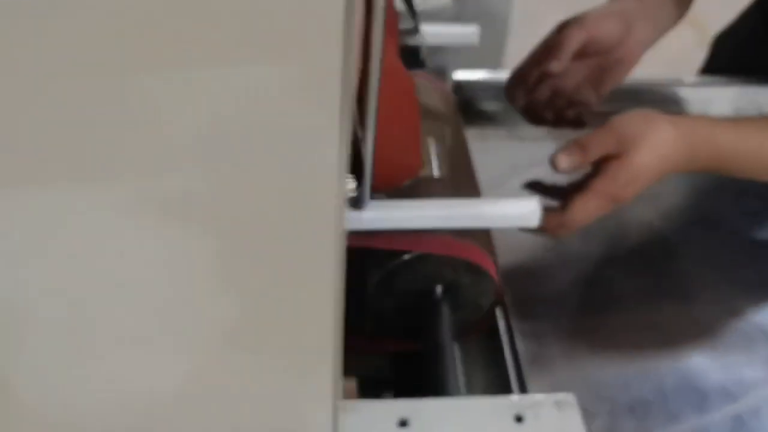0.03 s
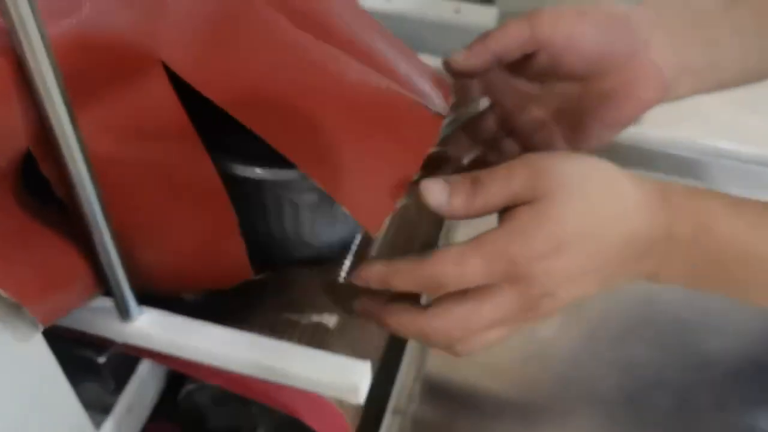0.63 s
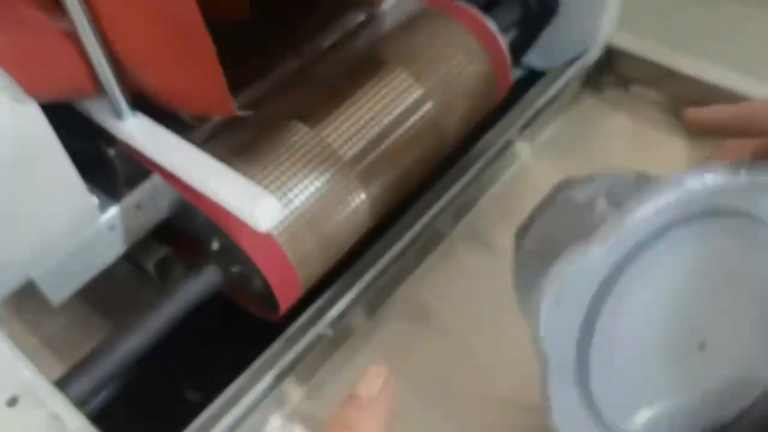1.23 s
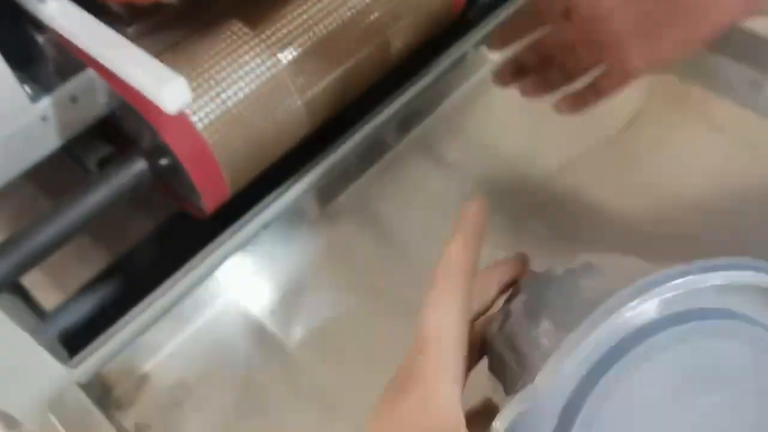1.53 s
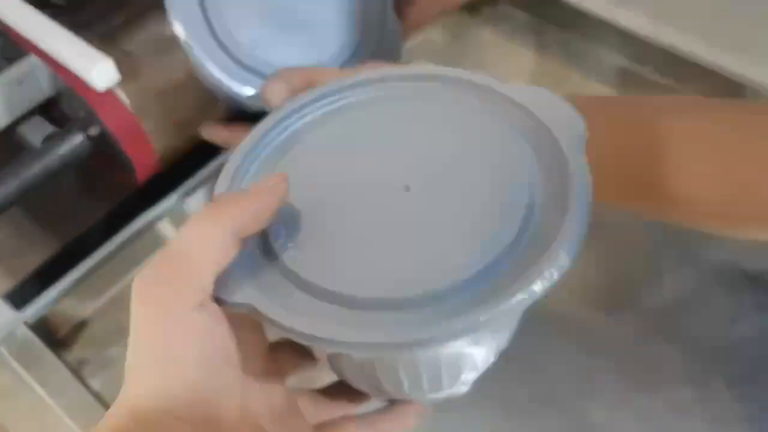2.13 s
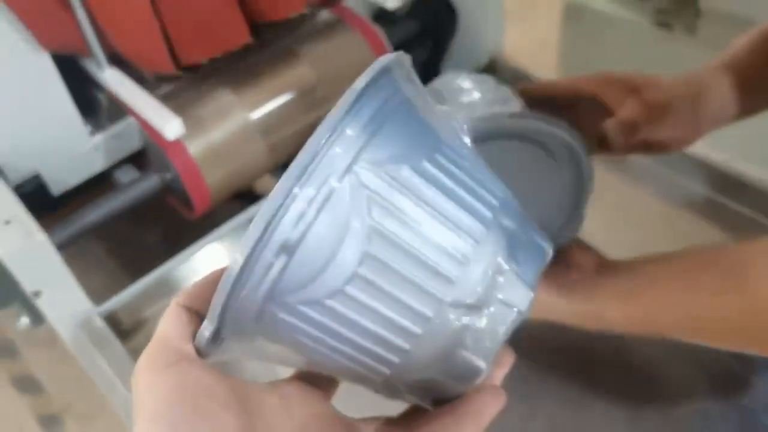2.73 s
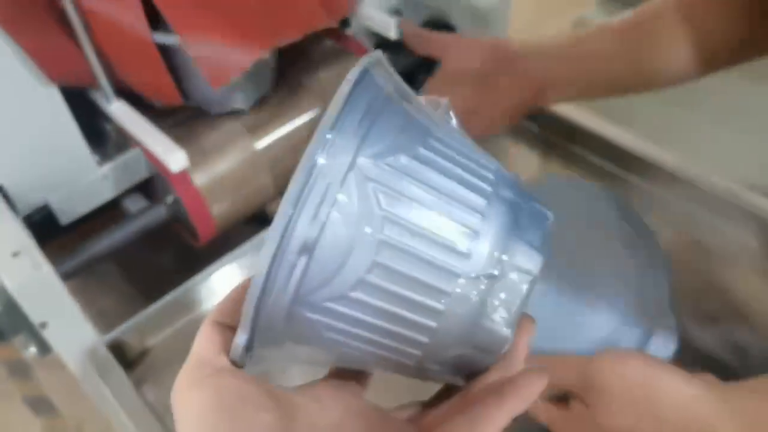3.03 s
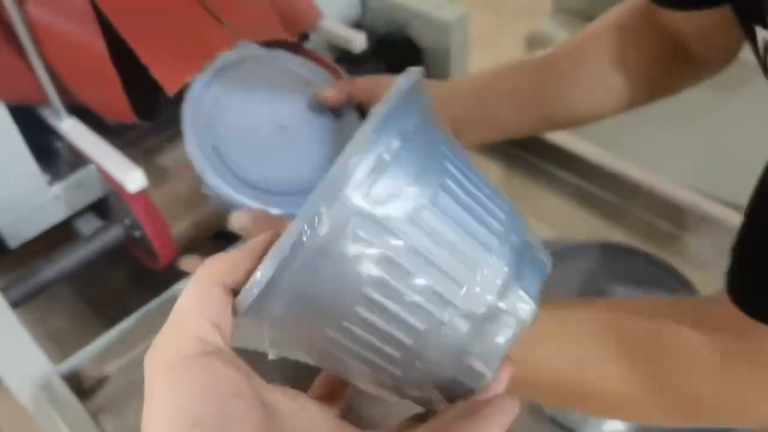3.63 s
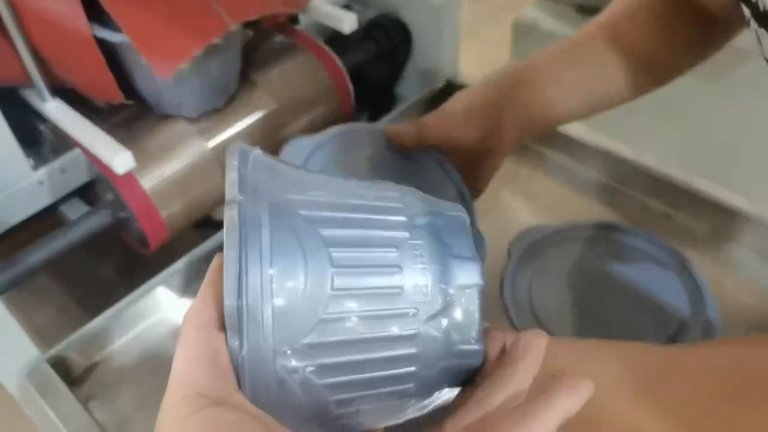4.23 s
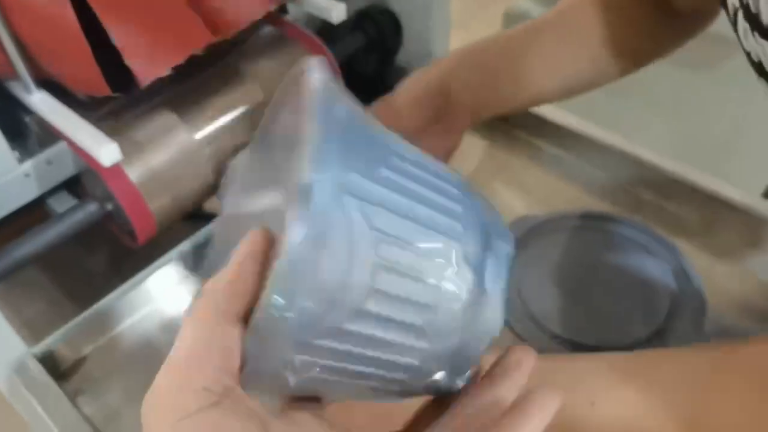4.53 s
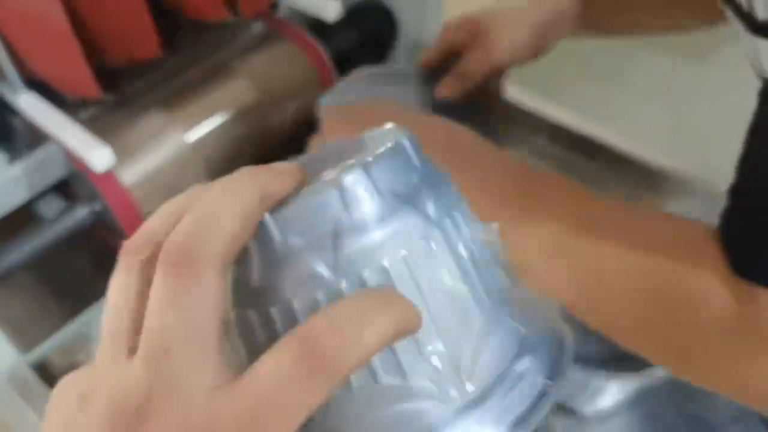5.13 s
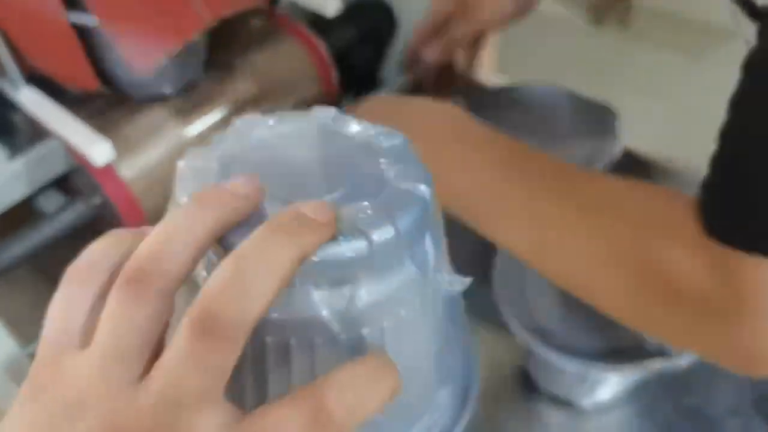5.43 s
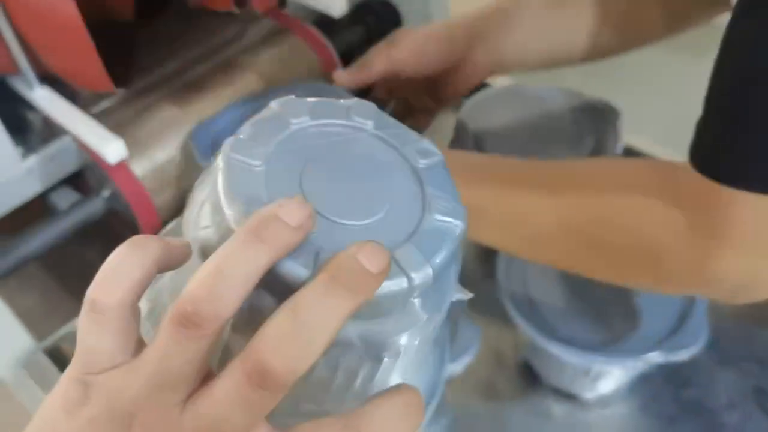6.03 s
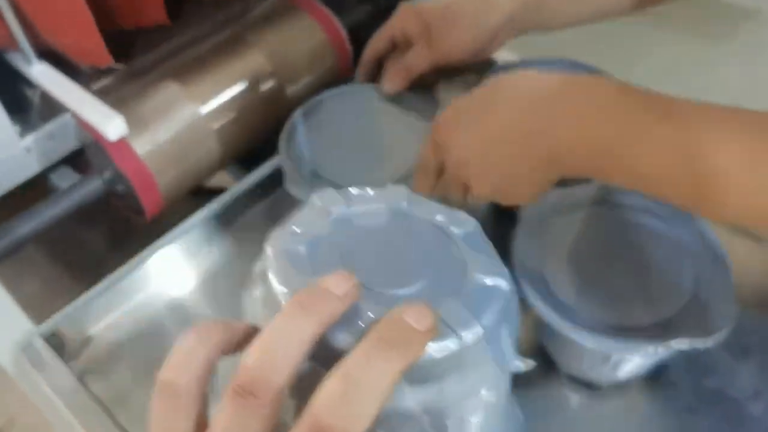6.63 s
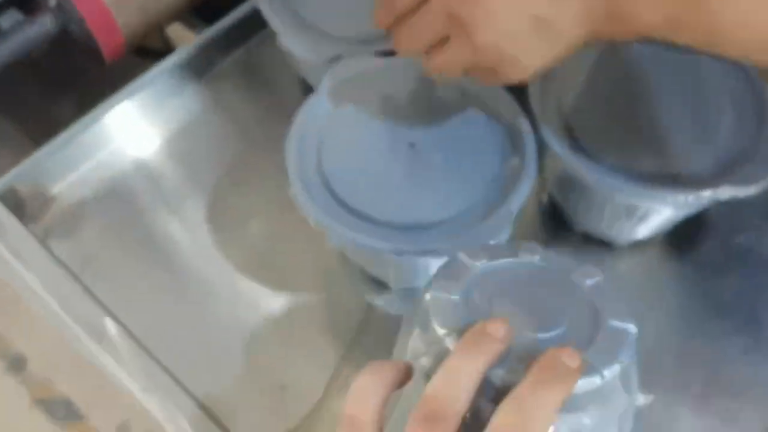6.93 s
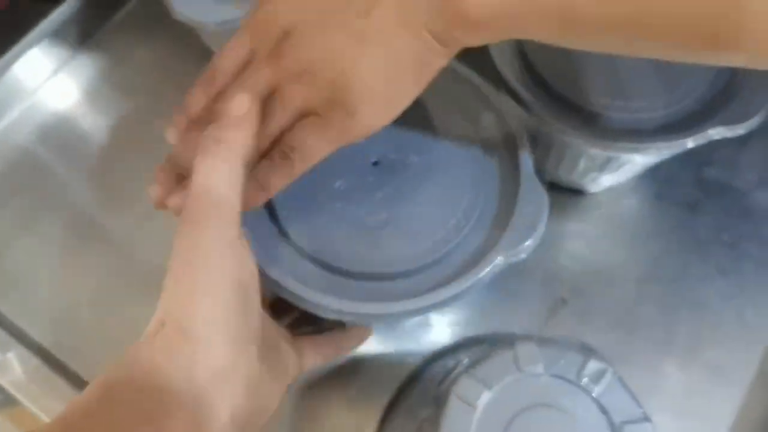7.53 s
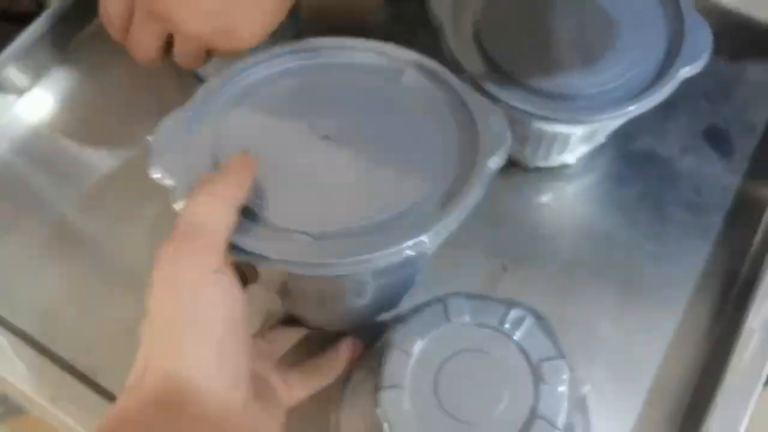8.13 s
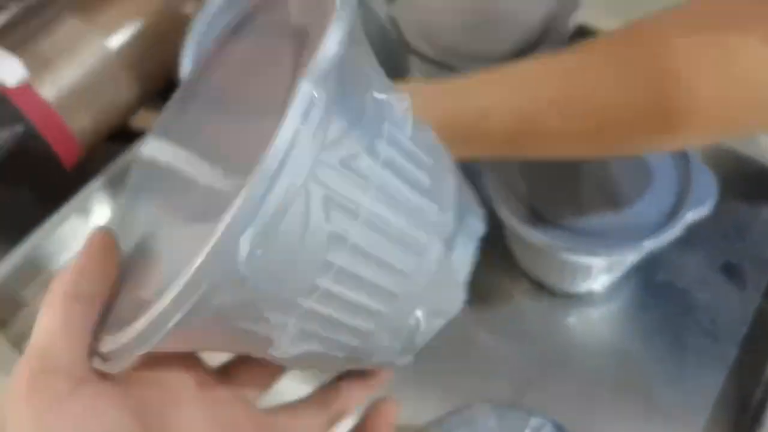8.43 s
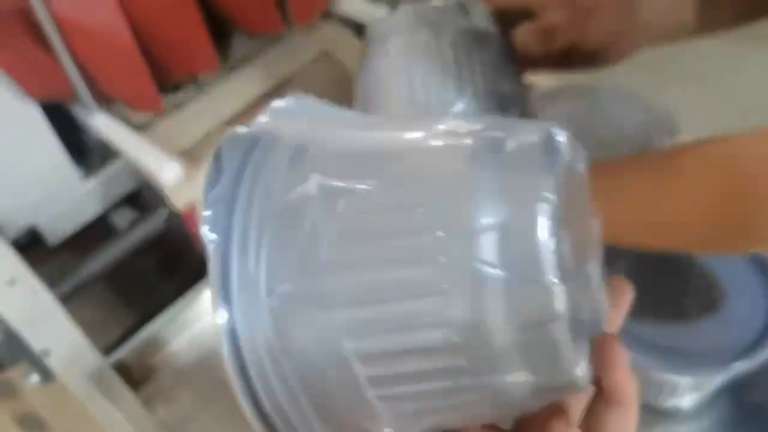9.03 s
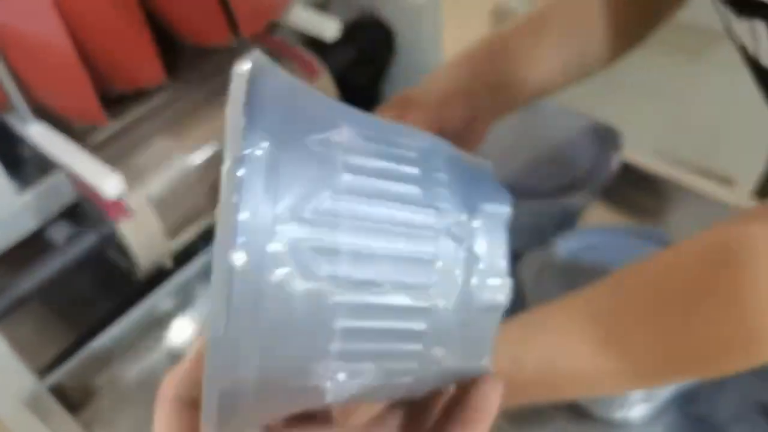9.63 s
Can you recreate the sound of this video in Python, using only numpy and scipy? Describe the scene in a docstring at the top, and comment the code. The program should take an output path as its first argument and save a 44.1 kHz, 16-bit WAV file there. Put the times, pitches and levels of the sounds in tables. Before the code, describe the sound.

Steady blower roar and hissing air from a shrink-wrap machine, with light plastic film crinkles and a few dull knocks of bowls on steel.

```python
"""Factory floor, beside the outlet conveyor of a shrink-wrap machine.
Motors hum, their drive whines faintly, turbulence roars in the blower. Escaping air hisses, flutters
and rings in cavities as the listener moves past the tunnel mouth and over a steel tray.
Wrapped plastic bowls are handled: the film crinkles in tiny snaps, and the bowls ring the tray
with dull knocks and one short slide."""
import sys
import numpy as np
from scipy import signal
from scipy.fft import rfft, irfft, next_fast_len
from scipy.io import wavfile

SR = 44100
rng = np.random.default_rng(int(sys.argv[2]) if len(sys.argv) > 2 else 0)


def pcm_store(signal):
    """Save signal as 16-bit PCM."""
    levels = np.round(np.clip(np.atleast_2d(signal), -1, 1) * 32767)
    wavfile.write(sys.argv[1], SR, levels.astype(np.int16).T)


N = 435708
TIME = np.arange(N) / SR

# motors and fan wheels: pitch_hz, level_db
ROTOR_HUMS = [(42.4, -72), (68.6, -58), (109.0, -53), (191.1, -49)]
# two strongest hums along the listener's path: time_s, level_db
LOW_HUM_LEVEL = [(0, -44.5), (0.95, -40.5), (1.2, -53), (1.65, -43.5), (2.15, -52), (4.3, -50), (5.45, -44),
                 (6.05, -59), (6.6, -43), (7.2, -43), (7.8, -46), (8.1, -61), (8.85, -41.5), (9.1, -53),
                 (9.55, -39.5), (9.88, -48)]
HIGH_HUM_LEVEL = [(0, -46), (0.5, -51), (1.8, -44.5), (2.35, -49), (3.1, -42.5), (4.7, -41), (5.0, -50),
                  (5.4, -43.5), (6.3, -42), (6.9, -54), (7.3, -38), (8.0, -48.5), (8.55, -41), (9.0, -49),
                  (9.88, -43)]
# drive sidebands, lowest first: level_db
SIDEBANDS_DB = [-62, -51, -60, -50.5]
# blower turbulence: freq_hz, relative_density_db
ROAR_SPECTRUM = [(25, -29), (52, -25.5), (72, -15), (115, -6), (176, -4), (215, 2), (255, -3), (305, -3),
                 (345, -8.5), (400, -12), (480, -16), (720, -16.5), (1250, -22.5), (2000, -25)]
# low and upper roar at the listener: time_s, gain_db
LOW_ROAR_GAIN = [(0, -29), (0.1, -33), (0.22, -35), (0.7, -29.5), (0.92, -32.5), (1.1, -27.5), (1.3, -32.5),
                 (1.5, -30), (1.8, -30), (1.95, -32), (2.22, -29), (2.34, -32.5), (3.3, -32.5),
                 (4.0, -32.5), (4.18, -36), (4.45, -31), (4.9, -33), (5.12, -34.5), (5.33, -30.5),
                 (5.65, -35), (6.0, -34), (6.3, -31.5), (6.48, -31), (6.68, -30), (6.9, -33.5), (7.4, -31),
                 (8.8, -32), (9.18, -35.5), (9.45, -29.5), (9.88, -33.5)]
UPPER_ROAR_GAIN = [(0, -32.5), (7.5, -31), (8.4, -33.5), (9.88, -32.5)]
# fan and bearing whistles: pitch_hz, width_hz, level_db
WHISTLES = [(392, 9.6, -53), (1632, 17, -55.5), (2926, 15, -57.5)]
# air resonances of tunnel mouth, belt jet and tray: pitch_hz, width_hz, relative_db
MOUTH_MODES = [(813, 130, -2.5), (1100, 310, -2.5), (1910, 160, -18)]
JET_MODES = [(5200, 250, -8), (7800, 93, 0)]
TRAY_AIR_MODES = [(1610, 130, -8), (2226, 125, -0.5), (2430, 140, -5), (2900, 130, -8), (4070, 180, -10)]
# tunnel rush and fine hiss: freq_hz, relative_density_db
RUSH_SPECTRUM = [(1200, -7.5), (1900, -6), (2200, -0.5), (2500, -0.5), (3150, -1.4), (3800, -2.5),
                 (4600, 0), (6000, -51)]
HISS_SPECTRUM = [(2500, -23.5), (3900, -18), (4900, -5.5), (6050, -2.5), (6800, -4.5), (7350, -2.5),
                 (7900, 1.7), (8250, 3.5), (8600, -1), (8900, -5), (9250, -70), (11000, -40), (11500, -76)]
# escaping air at the listener: time_s, level_db
AIR_LEVEL = [(0.5, -27), (0.85, -28), (1.15, -26.5), (1.45, -27.5), (1.75, -27), (2.6, -28.5), (2.85, -30),
             (3.35, -31), (3.65, -28.5), (4.1, -28.5), (5.05, -29), (5.35, -27.5), (5.7, -29), (6.2, -27),
             (7.1, -26.5), (7.35, -27), (8.1, -26.5), (8.55, -28.5), (9.25, -29), (9.55, -27.5),
             (9.88, -29)]
# fingers rubbing film: time_s, level_db
RUSTLE_LEVEL = [(0, -62), (2.5, -61), (2.9, -51.5), (4.7, -55), (5.3, -47.5), (8.4, -52), (8.8, -59),
                (9.88, -63)]
# film crinkles as a bowl is lifted and turned: peak_s, level_db
CRINKLES = [(2.93, -53), (3.6, -39), (4.0, -48), (5.02, -47), (5.3, -45), (6.19, -38), (7.09, -35),
            (7.41, -41), (7.62, -43), (7.795, -38), (7.895, -39), (8.46, -44)]
# steel tray loaded with a bowl: pitch_hz, gain_db, t60_s
TRAY_MODES = [(139, -2.5, 0.074), (198, 3.5, 0.015), (275, -6.5, 0.072), (333, -8.5, 0.047),
              (480, -12, 0.022), (660, -8.5, 0.011), (855, -12, 0.018), (1340, -4, 0.018), (1740, 0, 0.022)]
# bowl impacts: start_s, impulse_db, contact_cutoff_hz
KNOCKS = [(4.567, -26, 700), (4.581, -21, 500), (4.607, -20.5, 1500), (4.612, -24.5, 1700),
          (4.619, -30, 1900), (4.642, -22, 400), (4.655, -20, 400), (4.729, -22, 500), (7.153, -15, 400),
          (7.243, -13, 520), (7.384, -20, 450), (7.488, -15.5, 400)]


def from_db(db):
    """Decibels to gain."""
    return 10 ** (np.asarray(db) / 20)


def unit_rms(x):
    """Scale to unit power."""
    return x / np.sqrt(np.mean(x ** 2) + 1e-20)


def envelope(rows):
    """Per-sample gain from (time_s, level_db) rows."""
    return from_db(np.interp(TIME, *np.transpose(rows)))


def noise(gain_at):
    """Unit-power noise shaped by gain_at(hz)."""
    size = next_fast_len(N)
    hz = np.maximum(np.arange(size // 2 + 1) * SR / size, 1)
    return unit_rms(irfft(rfft(rng.standard_normal(size)) * gain_at(hz), size)[:N])


def drift(rate_hz):
    """Slow random signal, unit rms."""
    points, step = 16384, 32
    hz = np.arange(points // 2 + 1) * SR / (points * step)
    slow = irfft(rfft(rng.standard_normal(points)) / (1 + (hz / rate_hz) ** 2))
    return unit_rms(np.interp(np.arange(N) / step, np.arange(points), slow))


def turbulence(spectrum):
    """Unit-power flow noise; 12 dB/octave skirts beyond the given spectrum."""
    points_hz, points_db = np.transpose(spectrum)
    skirts = lambda hz: np.minimum(hz / points_hz[0], 1) ** 2 * np.minimum(points_hz[-1] / hz, 1) ** 2
    return noise(lambda hz: skirts(hz) * from_db(np.interp(np.log(hz), np.log(points_hz), points_db)))


def resonances(modes):
    """Noise ringing in steep-sided bands."""
    return sum(from_db(db) * noise(lambda hz: 1 / (1 + ((hz - pitch_hz) / width_hz) ** 2))
               for pitch_hz, width_hz, db in modes)


def tone(hz, wander_hz, waver_db):
    """Unit-power sine; pitch and level waver with load."""
    phase = 2 * np.pi * np.cumsum(hz + wander_hz * drift(2.03)) / SR
    return unit_rms(np.sin(phase) * from_db(waver_db * drift(0.38)))


def ring(force, hz, t60_s):
    """Damped mode; a unit impulse rings at amplitude 1."""
    radius = from_db(-60 / (t60_s * SR))
    angle = 2 * np.pi * hz / SR
    return signal.lfilter([0, np.sin(angle)], [1, -2 * radius * np.cos(angle), radius ** 2], force + 1e-18)


def glide(x, pitch_ratio):
    """Resample by a time-varying pitch ratio."""
    fine = signal.resample_poly(x, 2, 1)
    return np.interp(2 * np.cumsum(pitch_ratio), np.arange(len(fine)), fine, period=len(fine))


def patchy(x, spread_db, span_s, span_hz):
    """Random swells and dips in time-frequency patches."""
    hz, time_s, cells = signal.stft(x, SR, nperseg=1024)
    patches = rng.standard_normal(cells.shape)
    for axis, (step, span) in enumerate(((hz[1], span_hz), (time_s[1], span_s))):
        pole = np.exp(-step / span)
        patches = signal.filtfilt([1 - pole], [1, -pole], patches, axis=axis, method="gust")
    gain_db = spread_db * 2 * np.tanh(unit_rms(patches) / 2)
    return signal.istft(cells * unit_rms(from_db(gain_db)), SR)[1][:N]


def motor_hum(low_hz=95.7, high_hz=145.8, flutter_db=2.0):
    """Rotor tones; the two strongest swell and fade as the listener moves."""
    hum = sum(from_db(db) * tone(hz, wander_hz=0.65, waver_db=5.5) for hz, db in ROTOR_HUMS)
    for hz, rows in ((low_hz, LOW_HUM_LEVEL), (high_hz, HIGH_HUM_LEVEL)):
        line = envelope(rows) * tone(hz, wander_hz=1.59, waver_db=0.5)
        hum += line * from_db(flutter_db * drift(6.0))
    return hum


def drive_whine(lowest_hz=5907.3, spacing_hz=61.7):
    """Evenly spaced sidebands of the drive's switching rate."""
    return sum(from_db(db) * tone(lowest_hz + k * spacing_hz, wander_hz=4, waver_db=5.0)
               for k, db in enumerate(SIDEBANDS_DB))


def blower(wander=0.03, trim_db=0.28, buffet_db=0.69, surge_db=0.5, surge_below_hz=340):
    """Housing turbulence buffets and its low band surges; fan and bearings whistle faintly."""
    roar = glide(turbulence(ROAR_SPECTRUM), 1 + wander * drift(3.0))
    roar *= from_db(trim_db + buffet_db * drift(23))
    low = signal.sosfiltfilt(signal.butter(2, surge_below_hz, fs=SR, output="sos"), roar)
    surging = low * envelope(LOW_ROAR_GAIN) * from_db(surge_db * drift(12.0))
    upper = (roar - low) * envelope(UPPER_ROAR_GAIN)
    return surging + upper + resonances(WHISTLES)


def panel_shade(x, db_per_khz=1, s_per_khz=0.057):
    """A side panel shades the air at first; treble opens as the listener steps out."""
    hz, time_s, cells = signal.stft(x, SR, nperseg=512)
    khz = np.maximum(hz, 1)[:, None] / 1000
    shade = np.clip(1 - time_s / (s_per_khz * khz), 0, 1)
    return signal.istft(cells * from_db(-db_per_khz * khz * shade), SR)[1][:N]


def escaping_air(rush_db=-39, rush_exponent=0.84, rush_flutter_db=0.64, hiss_flutter_db=0.7):
    """Eddies make the tunnel rush flutter in patches; the fine hiss is steadier."""
    strength = envelope(AIR_LEVEL)
    rush = patchy(turbulence(RUSH_SPECTRUM), spread_db=3.5, span_s=0.0086, span_hz=87.0)
    rush *= unit_rms(strength) ** rush_exponent * from_db(rush_db + rush_flutter_db * drift(22))
    hiss = patchy(turbulence(HISS_SPECTRUM), spread_db=1.1, span_s=0.016, span_hz=110)
    hiss *= strength * from_db(hiss_flutter_db * drift(17))
    return panel_shade(rush + hiss)


def pass_by(nearest_s, half_power_s, peak_db, steepness):
    """Gain of a local source as the listener passes."""
    return from_db(peak_db) / np.sqrt(1 + np.abs((TIME - nearest_s) / half_power_s) ** steepness)


def cavities(mouth_wander=0.04, tray_glide=0.05):
    """Air rings in the tunnel mouth, along the belt and over the tray, rising as that gap closes."""
    mouth = glide(resonances(MOUTH_MODES), 1 + mouth_wander * drift(1.218))
    mouth *= pass_by(nearest_s=1.08, half_power_s=0.72, peak_db=-43, steepness=12)
    jet = resonances(JET_MODES)
    jet *= pass_by(nearest_s=1.45, half_power_s=0.13, peak_db=-32.5, steepness=12)
    near_tray = pass_by(nearest_s=7.72, half_power_s=0.34, peak_db=-40.5, steepness=3.2)
    pitch_ratio = 1 + tray_glide * (near_tray / near_tray.max() - 1)
    tray_air = glide(resonances(TRAY_AIR_MODES), pitch_ratio) * near_tray
    return mouth + jet + tray_air


def film(snaps_per_s=1200, band_hz=(9300, 10970), rise_s=0.0061, decay_s=0.016, clump_db=2.0):
    """Tiny bright snaps: brief clusters under strain, faint crackle under the fingers."""
    snaps = (rng.random(N) < snaps_per_s / SR) * rng.standard_normal(N)
    snaps = signal.sosfilt(signal.butter(4, band_hz, "band", fs=SR, output="sos"), snaps + 1e-18)
    strain = sum(from_db(db) * np.exp(-np.abs(TIME - peak_s) / np.where(TIME < peak_s, rise_s, decay_s))
                 for peak_s, db in CRINKLES)
    rubbing = envelope(RUSTLE_LEVEL) * from_db(clump_db * drift(7.2))
    crackle = patchy(snaps, spread_db=18.5, span_s=0.011, span_hz=198)
    return unit_rms(snaps) * strain + unit_rms(crackle) * rubbing


def tray(force):
    """Steel tray modes, alternating in sign."""
    return sum(from_db(db) * (-1) ** k * ring(force, hz, t60_s)
               for k, (hz, db, t60_s) in enumerate(TRAY_MODES))


def bowl_slide(peak_s=4.63, rise_s=0.083, fall_s=0.2, level_db=-28.8, friction_hz=400):
    """Friction drives the tray as a pushed bowl speeds up fast and runs out slowly."""
    friction = noise(lambda hz: hz / (1 + (hz / friction_hz) ** 4))
    speed = np.exp(-((TIME - peak_s) / np.where(TIME < peak_s, rise_s, fall_s)) ** 2)
    return from_db(level_db) * speed * unit_rms(tray(friction))


def bowl_groan(peak_s=4.785, half_length_s=0.042, pitch_hz=308, gain_db=-32, judder_db=2.5):
    """The slowing bowl's foot judders in a low groan."""
    groan = tone(pitch_hz, wander_hz=8.03, waver_db=2) * from_db(gain_db + judder_db * drift(25))
    return groan * np.exp(-((TIME - peak_s) / half_length_s) ** 2)


def bowl_knocks(clack_db=7.5):
    """Soft pushes ring the tray, harder contacts its higher modes; the thin plastic wall clacks."""
    force = np.zeros(N)
    for start_s, impulse_db, cutoff_hz in KNOCKS:
        age = np.maximum(TIME - start_s, 0) * 2 * np.pi * cutoff_hz  # in time constants
        push = age * np.exp(-np.minimum(age, 60))
        force += from_db(impulse_db) * push / push.sum()
    clack = from_db(clack_db) * ring(force, hz=1300, t60_s=0.0035)
    return tray(force) + clack


def bowls(highpass_hz=70):
    """Bowls on the tray; the thin sheet radiates little deep bass."""
    contacts = bowl_knocks() + bowl_slide() + bowl_groan()
    return signal.sosfilt(signal.butter(2, highpass_hz, "high", fs=SR, output="sos"), contacts)


def scene():
    """Mono mix on both channels."""
    machine = blower() + motor_hum() + drive_whine() + escaping_air() + cavities()
    mix = machine + bowls() + film()
    return np.array([mix, mix])


def record(dry, cutoff_hz=11600):
    """Steep low-pass."""
    return signal.sosfilt(signal.ellip(10, 0.1, 90, cutoff_hz, fs=SR, output="sos"), dry)


dry = scene()
out = record(dry)
pcm_store(out)
```